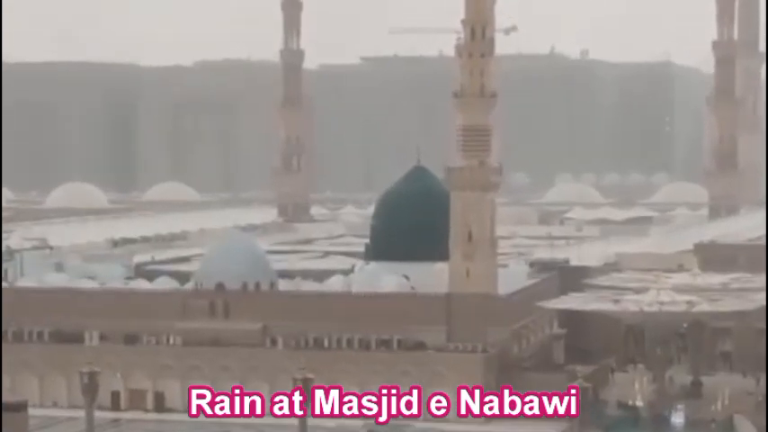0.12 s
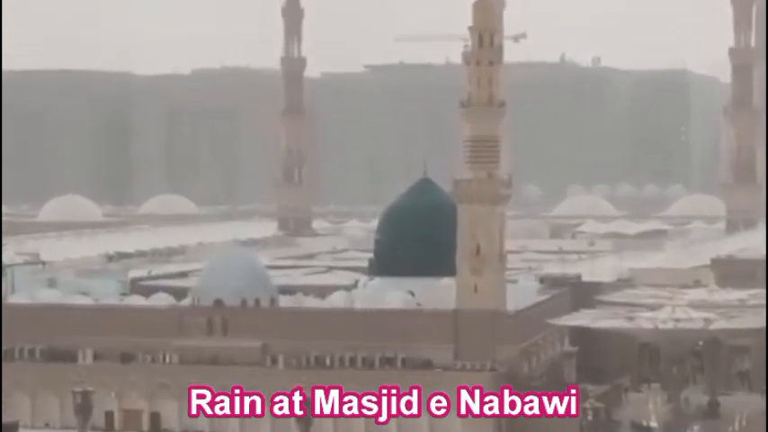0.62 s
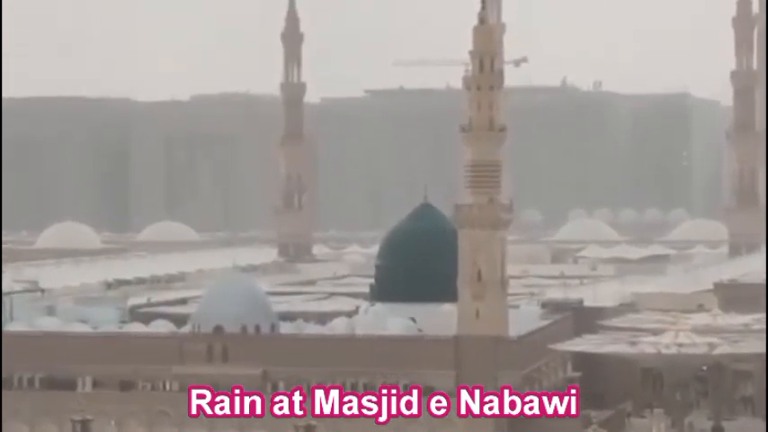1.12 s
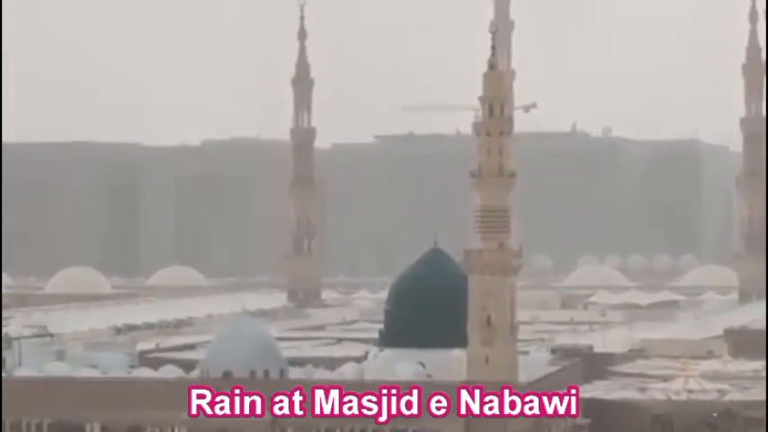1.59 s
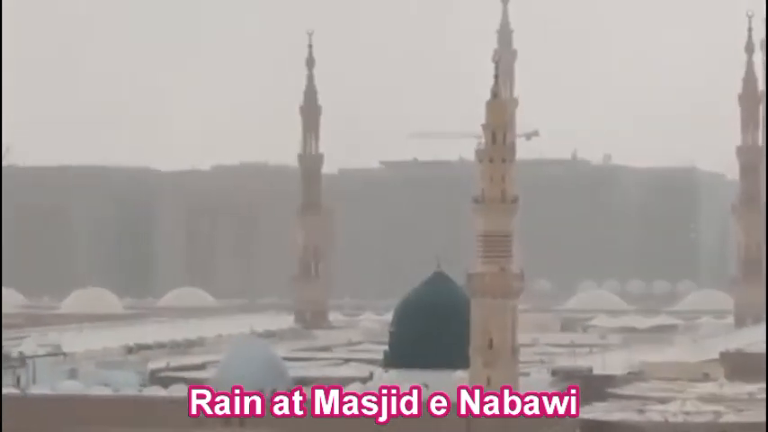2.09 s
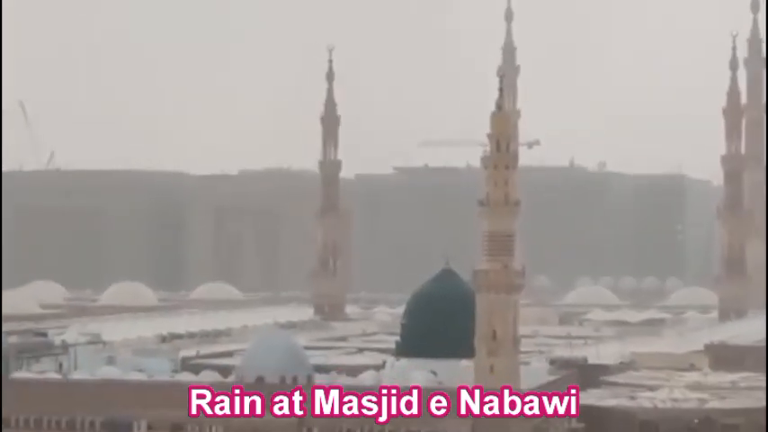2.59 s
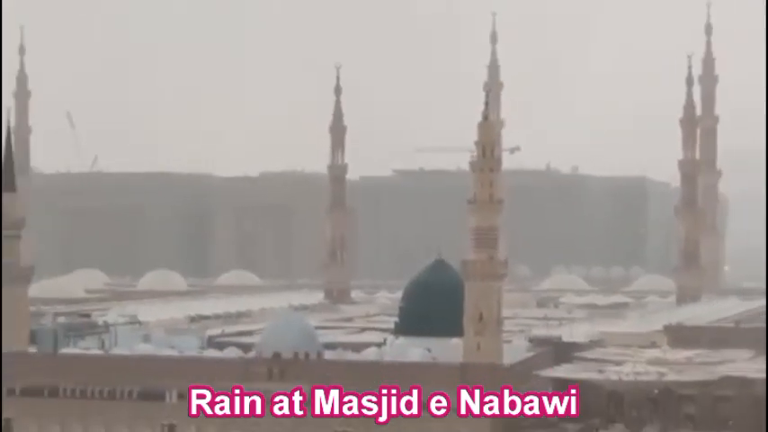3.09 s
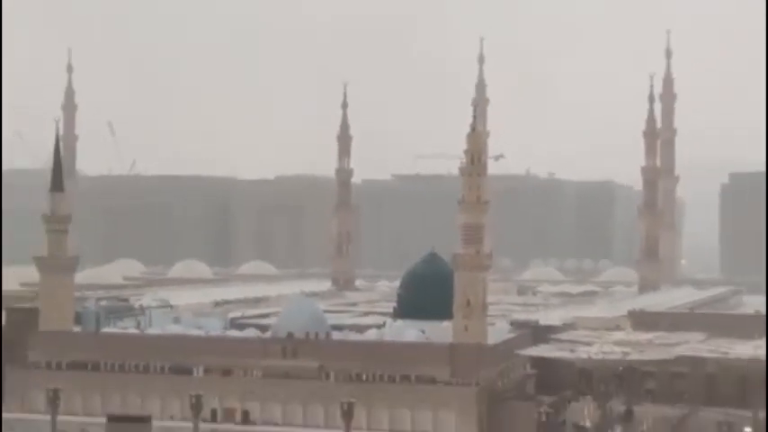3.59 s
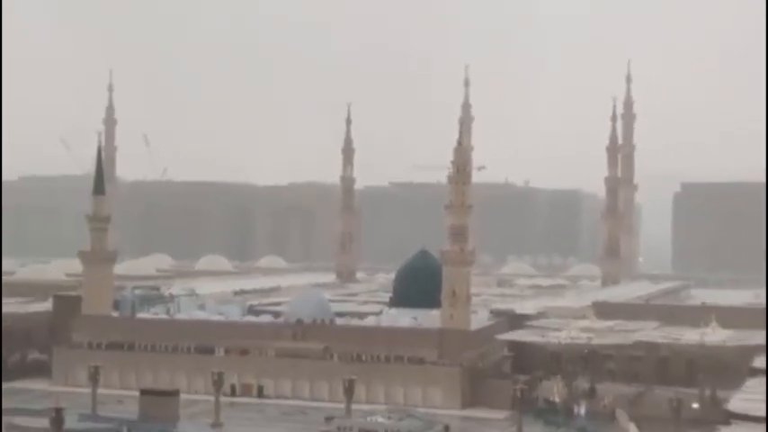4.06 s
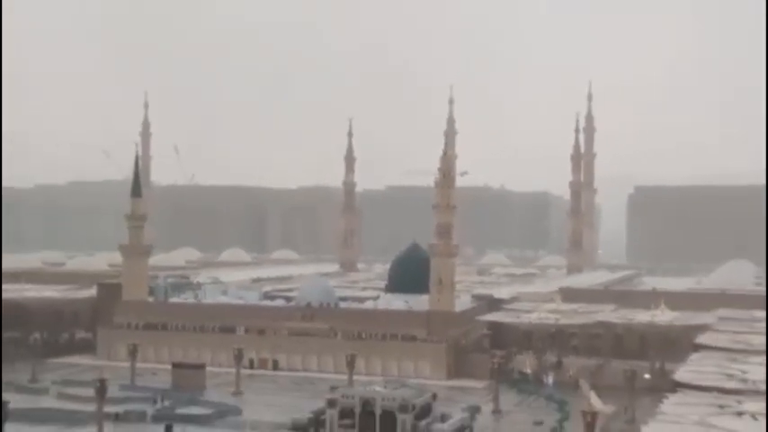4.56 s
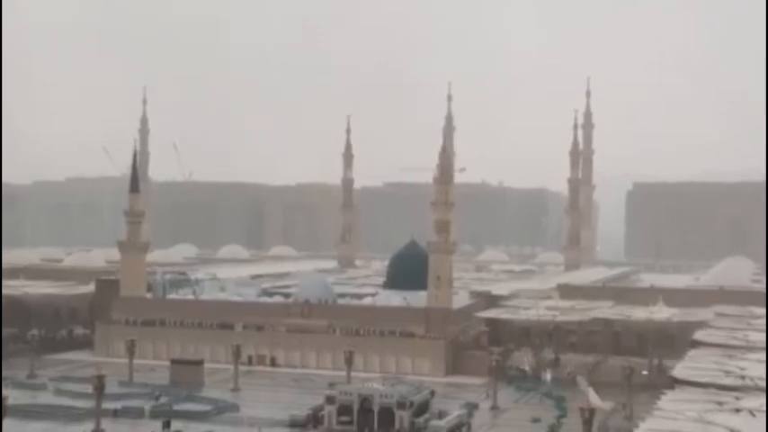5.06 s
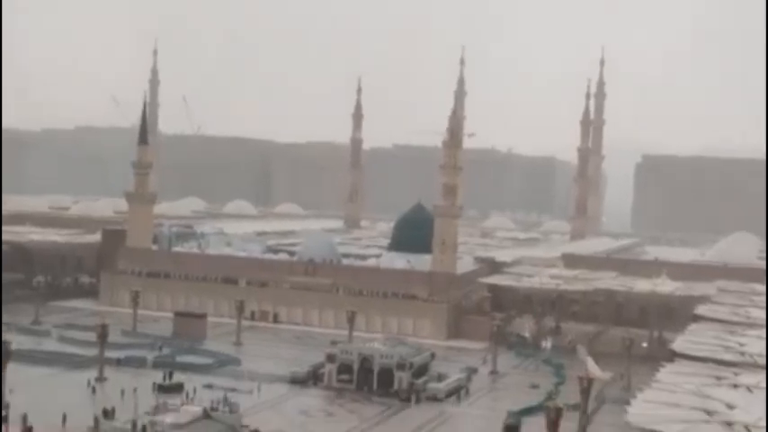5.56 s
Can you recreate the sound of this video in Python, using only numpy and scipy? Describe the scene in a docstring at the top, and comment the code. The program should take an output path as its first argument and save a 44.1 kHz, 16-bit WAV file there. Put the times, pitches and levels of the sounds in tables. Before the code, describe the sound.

Outdoors above a large paved square, dense rain makes a constant wide hiss with a fine patter of nearer drops. Far thunder is already building at the start, rolls strongest near two seconds, eases after three, swells again past four and fades. One larger drop puffs close by around three and a half seconds. The stereo microphones are high up; the treble is dull and slightly watery from compression.

```python
"""A wide paved square in heavy rain, heard from high up by a pair of microphones, with far thunder rolling.
Rain: shaped noise makes a smooth wide hiss, short ticks make the fine patter of nearer drops, and a puff
of noise makes one larger drop close by. Narrow, brief gaps are cut into the sound of hiss and patter.
Thunder: shock fronts from many parts of the lightning channel arrive as five dense, dull streams of
clicks that swell and fade, with small patches made louder or quieter."""
import sys
import numpy as np
from scipy import signal
from scipy.fft import rfft, irfft, next_fast_len
from scipy.io import wavfile
from scipy.ndimage import uniform_filter1d

SR = 44100
rng = np.random.default_rng(int(sys.argv[2]) if len(sys.argv) > 2 else 0)


def file_out(sig):
    """Save sig as 16-bit WAV at sys.argv[1]."""
    # one column per channel
    cols = np.atleast_2d(sig).T
    # limit, then scale
    lim = np.clip(cols, -1, 1)
    pcm = np.round(lim * 32767).astype(np.int16)
    wavfile.write(sys.argv[1], SR, pcm)


def makeup_ratio(level_db):
    """Linear amplitude ratio for a level in decibels (20 dB per factor of ten)."""
    decades = np.asarray(level_db, float) / 20
    return 10 ** decades


N = 250047  # samples, about 5.67 s


def evened(x):
    """Scales a sound to an average strength (rms) of 1."""
    return x / np.sqrt(np.mean(x ** 2) + 1e-20)


def smoothed_twice(x, size):
    """Takes a running average two times over."""
    return uniform_filter1d(uniform_filter1d(x, size), size)


def read(points, hz):
    """Reads a table between its points, with pitch spaced as the ear hears it (log scale)."""
    f, value = np.transpose(points)
    return np.interp(np.log(hz + 1), np.log(f + 1), value)


def curve(rows, t):
    """Reads every column of a table of times at the moments t."""
    s, *columns = np.transpose(rows)
    return [np.interp(t, s, c) for c in columns]


def scatter(per_s, spread_db):
    """Clicks of random sign at random moments; a few are large."""
    when, sign = rng.random((2, N))
    size = makeup_ratio(spread_db * np.minimum(rng.exponential(1, N), 4))
    return (when < per_s / SR) * np.sign(sign - 0.5) * size


def share_below(field):
    """About the share of normal random numbers that lie below each value."""
    return 1 / (1 + np.exp(-1.702 * field))


# Colour of the hiss, shape only: [f/Hz, level/dB per Hz]
RAIN_COLOUR = [(90, -80), (150, -22), (200, -0.5), (300, -7), (492, -0.5), (700, -1), (1060, -3),
               (2030, -3), (2800, -4), (3660, -5), (4910, -4.5), (7000, -8), (7600, -9.5), (7850, -14.5),
               (8020, -21), (8250, -16.5), (9240, -21.5), (10800, -25.5), (11500, -27.5), (11900, -34),
               (12150, -55), (13000, -90)]
# Hiss before the gaps are cut: [t/s, level/dB, extra level below about 1500 Hz/dB]
RAIN_LEVEL = [(0.0, -30, 0.6), (0.6, -31.5, 0.8), (1.2, -31, 0.2), (1.9, -31.2, -0.6), (2.4, -31.5, -2),
              (3.0, -31, -.5), (3.5, -30, -2), (5.1, -31.5, -0.5), (5.67, -30.5, -1.5)]
# How alike the hiss is at left and right: [f/Hz, likeness (1 = the same)]
RAIN_LIKENESS = [(120, 0.92), (300, 0.87), (1200, 0.18), (2500, 0.039), (7000, 0.013), (7800, .05),
                 (8200, 0.23), (11500, 0.16)]
# Left against right: [f/Hz, left minus right level/dB]
RAIN_BALANCE = [(120, -5), (300, 3), (1000, 0), (3000, 0.5), (6000, -0.7), (9000, -2.5)]
RAIN_LAG_S = 0.000045  # below the treble, the hiss reaches the right microphone this much earlier


def rain():
    """Countless far drops blend to noise, with faint drifting patches and a quick shared flicker."""
    frames, hz = N // 512 + 5, np.fft.rfftfreq(2048, 1 / SR)
    a, b, c, d, patches = rng.standard_normal((frames, 1025, 5)).T
    patches = uniform_filter1d(patches, size=16, axis=0)
    patches = evened(uniform_filter1d(patches, size=5, axis=1))
    flicker = evened(uniform_filter1d(rng.standard_normal(frames), size=4))

    # the right side is partly a copy of the left, partly noise of its own
    same = read(RAIN_LIKENESS, hz)[:, None]
    left, own = a + 1j * b, c + 1j * d
    z = np.array([left, same * left + np.sqrt(1 - same ** 2) * own])

    half_balance_db = read(RAIN_BALANCE, hz)[:, None] / 2
    colour_db = read(RAIN_COLOUR, hz)[:, None] + 0.26 * patches + 0.08 * flicker
    z *= makeup_ratio(colour_db + np.array([half_balance_db, -half_balance_db]))
    lag_s = RAIN_LAG_S / (1 + (hz / 4000) ** 6)
    z[0] *= np.exp(-2j * np.pi * hz * lag_s)[:, None]

    body_db = curve(RAIN_LEVEL, (np.arange(frames) - 2) * 512 / SR)[1]
    z *= makeup_ratio(body_db / (1 + (hz[:, None] / 1500) ** 4))
    hiss = evened(signal.istft(z, nperseg=2048, noverlap=1536)[1][:, :N])
    return makeup_ratio(curve(RAIN_LEVEL, np.arange(N) / SR)[0]) * hiss


PATTER_DB, PATTER_PER_S = -47.5, 2500  # level before the gaps are cut; ticks per second


def patter():
    """Nearer drops: short ticks of a few cycles, each size of drop with its own pitch and place."""
    out = np.zeros((2, N))
    t = np.arange(200) / SR
    for hz in np.geomspace(1500, 5500, num=12):
        tick = np.sin(2 * np.pi * hz * t) * t * hz * np.exp(-t * hz / 1.4)
        ticks = signal.oaconvolve(scatter(PATTER_PER_S / 12, spread_db=5), evened(tick))[:N]
        place = rng.random() * np.pi / 2  # from left (0) to right
        out += np.outer([np.cos(place), np.sin(place)], ticks)
    return makeup_ratio(PATTER_DB) * evened(out)


# Brief, narrow gaps in the sound:
# [f/Hz, share of the time that is silent in the middle, the same at the sides]
GAPS = [(1210, 0.002, .01), (2320, 0.028, 0.061), (3520, 0.17, 0.098), (5100, 0.12, 0.07),
        (7200, 0.12, 0.16), (7540, 0.2, .4), (8170, 0.54, 0.95), (8750, 0.4, 0.75), (9400, 0.19, 0.68),
        (10500, 0.094, 0.52), (11500, 0.32, 0.47), (12000, 0.63, 0.83)]


def narrow_gaps(frames, hz):
    """Gains for the middle and the sides with brief narrow gaps, and wider blocks of silence above 7800 Hz."""
    thin, wide = rng.standard_normal((frames, len(hz), 2, 2)).T
    thin = uniform_filter1d(uniform_filter1d(thin, 6, axis=1), 7, axis=2)
    wide = uniform_filter1d(uniform_filter1d(wide, 30, axis=1), 7, axis=2)
    wide = wide[:, np.arange(len(hz)) // 18 * 18]  # blocks have straight edges
    blocks = 0.96 * (hz > 7800)[:, None]
    # the middle and the sides share the blocks but not the thin gaps
    field = np.sqrt(1 - blocks) * evened(thin) + np.sqrt(blocks) * evened(wide[0])

    rows = np.array(GAPS)
    share = np.array([read(rows[:, [0, k]], hz) for k in (1, 2)])
    share = np.clip(share, 1e-4, 0.95)[..., None]
    soft_edge = 0.095 * np.minimum(share, 1 - share)
    return np.clip((share_below(field) - share) / soft_edge, 0, 1)


# Fine speckle of tiny gaps in the sound: [f/Hz, share that is silent]
SPECKLE = [(600, .03), (1400, .12), (2600, .25), (6000, .27), (7200, .45), (9000, .55), (11500, .6)]


def speckle(frames, hz):
    """Gains with tiny gaps, about 40 Hz wide and 50 ms long, that roughly keep the loudness."""
    field = rng.standard_normal((frames, len(hz), 2)).T
    field = evened(uniform_filter1d(uniform_filter1d(field, size=2, axis=1), size=5, axis=2))
    share = read(SPECKLE, hz)[:, None]
    return (share_below(field) > share) / np.sqrt(1 - share)


# One larger drop close by: [t/s, level before its rise and fade/dB]
SPLASHES = [(3.458, -31.5)]


def splash():
    """A larger drop: a soft puff of bright noise that dies fast."""
    out, t = np.zeros((2, N)), np.arange(8000) / SR
    band = signal.butter(8, [3800, 9700], "bandpass", fs=SR, output="sos")
    for s, db in SPLASHES:
        puff = evened(signal.sosfilt(band, rng.standard_normal((2, len(t)))))
        rise = 1 - np.exp(-t / 0.009)
        out[:, round(s * SR):][:, :len(t)] += puff * rise * makeup_ratio(db - 60 * t / 0.14)
    return out


def random_switch(share):
    """A switch that goes on and off at random, on for this share of the time."""
    slow = evened(smoothed_twice(rng.standard_normal(N), round(0.07 * SR)))
    return slow < np.quantile(slow, share)


def steadied(x, span_s, amount):
    """Divides out part of the chance swells that last longer than span_s, and evens the strength."""
    power = smoothed_twice((x ** 2).mean(axis=0), round(span_s * SR))
    return evened(x / (abs(power) + 1e-20) ** (amount / 2))


# Each stretch of the lightning channel sends one swell:
# [peak t/s, rise/s, peak level/dB, fade/dB per s, brightness/dB per octave]
SWELLS = [(0.55, 0.26, -23.5, 1, 1.65), (1.45, 0.3, -23.5, 3.5, -2), (1.9, 0.46, -19.5, 4.5, -0.1),
          (2.6, 0.64, -23.5, 20.5, -0.5), (2.95, 0.17, -26.5, 9, -3), (3.45, .15, -30, 16, -4),
          (4.3, 0.54, -24, 4, 1), (4.75, 0.44, -28, 4, -6.5)]
RISE_DB = 14.5  # a swell climbs this much during its rise
MIDDLE_HZ = 110  # brightness tilts a swell about this pitch


def roll(t, hz, under_db, late_s, fade_factor, lasting_db):
    """Level of one stream: swells climb, fade and add up over a lasting rumble."""
    power = makeup_ratio(lasting_db) ** 2
    for peak_s, rise_s, peak_db, fade, bright in SWELLS:
        since = t - peak_s - late_s
        drop_db = np.where(since < 0, RISE_DB * (since / rise_s) ** 2, fade * fade_factor * since)
        tilt_db = bright * np.log2(hz / MIDDLE_HZ)
        power = power + makeup_ratio(peak_db + under_db + tilt_db - drop_db) ** 2
    return np.sqrt(power)


# Small patches of the roll that are mostly louder, one slightly quieter: [t/s, f/Hz, added level/dB]
LOUDER_PATCHES = [(0.49, 115, 7), (0.51, 47, 13), (0.53, 182, 6), (0.63, 142, 10), (0.8, 74, 10),
                  (0.99, 114, 7), (1.05, 244, 9), (1.17, 307, 8), (1.46, 73, 2.5), (1.56, 178, 7),
                  (1.7, 400, 6.5), (1.82, 400, 4.5), (1.83, 224, 2.5), (1.88, 104, 10.5), (2.03, 128, 8.5),
                  (2.08, 65, 6), (2.13, 400, 6), (2.2, 240, 3.5), (2.3, 350, 2), (2.35, 35, 3),
                  (2.45, 200, 4.5), (2.55, 52, 13), (2.7, 55, 10), (2.83, 119, 3), (2.89, 99, 12),
                  (2.96, 93, -3), (3.02, 104, 5), (3.07, 114, 15), (3.21, 109, 3), (3.29, 95, 10),
                  (3.39, 163, 6.5), (3.46, 93, 12), (3.59, 65, 2), (3.7, 120, 3.5), (3.77, 115, 4),
                  (4.0, 150, 1), (4.15, 82, 5), (4.27, 51.6, 14), (4.28, 178, 12), (4.32, 290, 7),
                  (4.38, 183, 5.5), (4.45, 50, 5), (4.6, 103, 7.5), (4.74, 32, 14), (4.86, 65, 3),
                  (5.62, 65, 6)]
# Small patches of the roll that are mostly quieter, a few slightly louder: [t/s, f/Hz, removed level/dB]
QUIETER_PATCHES = [(1.3, 250, 4), (2.15, 150, 13), (2.55, 282, 5), (3.13, 95, -1), (3.5, 170, 4),
                   (3.65, 200, 8), (3.85, 230, 10), (4.7, 129, 8), (5.0, 110, 1), (5.2, 240, -2.5),
                   (5.37, 90, 8), (5.55, 220, 1), (0.15, 181, 4), (0.27, 203, 11), (1.13, 161, 19),
                   (1.57, 52, 7), (2.27, 114, 7), (2.44, 40, 14), (3.08, 47, 7), (3.2, 170, 2.5),
                   (3.54, 114, 6), (3.35, 35, 8), (3.68, 45, 6), (3.77, 58, 20.5), (3.88, 50, 14),
                   (4.03, 65.3, 9.5), (4.45, 100, 1), (4.98, 42, -1), (5.47, 101, 16)]
PATCH_S, PATCH_OCTAVES = 0.022, 0.22  # bell width (standard deviation) of a patch in time and pitch


def patched(x):
    """Makes small patches of the roll louder or quieter around their moment and pitch."""
    hz, t, z = signal.stft(x, SR, nperseg=2048, noverlap=1792)
    lift_db = np.zeros((len(hz), len(t)))
    for s, pitch_hz, db in LOUDER_PATCHES + [(s, pitch_hz, -db) for s, pitch_hz, db in QUIETER_PATCHES]:
        away_t = (t - s) / PATCH_S
        away_pitch = np.log2((hz[:, None] + 1) / pitch_hz) / PATCH_OCTAVES
        lift_db += db * np.exp(-away_t ** 2 / 2 - away_pitch ** 2 / 2)
    return signal.istft(z * makeup_ratio(lift_db), nperseg=2048, noverlap=1792)[1][:, :N]


# Stretches in which the left-right difference of the bass is dropped: [from t/s, to t/s]
BASS_ALIKE = [(-.1, .53), (1.06, 1.24), (1.43, 1.6), (2.4, 2.55), (2.64, 2.83), (3.23, 3.63), (5.08, 5.1)]


def bass_alike(x):
    """Takes the left-right difference below 162 Hz away during the listed stretches."""
    t, side = np.arange(N) / SR, (x[0] - x[1]) / 2
    shut = sum((t > a) & (t < b) for a, b in BASS_ALIKE) * 1.0
    shut = uniform_filter1d(shut, size=800)
    highpass = signal.butter(6, 162, "highpass", fs=SR, output="sos")
    low = (side - signal.sosfiltfilt(highpass, side)) * shut
    return x - np.array([low, -low])


# Colour of one shock after its path through the air, shape only; one list per stream,
# longest shocks first: [f/Hz, level/dB per Hz]
SHOCK_COLOURS = [
    [(12, -5.5), (24, -7), (32, -3), (40, -2.5), (55, 3), (66, -2), (85, -15), (200, -75)],
    [(40, -50), (60, -3), (75, 1.5), (100, 3), (120, -0.5), (145, -10), (400, -78)],
    [(70, -93), (110, -2), (130, 2), (155, 0), (180, 0), (200, -8.5), (240, -29), (600, -90)],
    [(70, -90), (130, -40), (175, -22), (210, 3), (300, -2), (350, -5), (385, -17), (450, -35), (900, -92)],
    [(150, -90), (290, -22), (380, -1), (450, -1.5), (650, -9.5), (1000, -17), (2000, -26), (5000, -75)],
]
# Clicks of each stream:
# [shocks per s, left-right difference against the shocks/dB, share of time the difference is switched on]
STREAMS = [(400, -18.5, 0.49), (708, -25.5, 0.53), (989, -20.5, 0.7), (3008, -11, .8), (2984, -9, 0.91)]
# How each stream follows the swells:
# [middle f/Hz, level against the swell/dB, arrives late/s, fade speed factor, lasting rumble level/dB]
STREAM_RULES = [(45, -10.5, 0.019, 1.7, -32), (90, -5.5, 0.0029, 1.58, -33.5),
                (150, -5, 0.024, 1.75, -37.5), (260, -13, 0.0025, 1.34, -43), (450, -21, .003, 1.32, -50.5)]


def thunder():
    """Five streams of shock fronts, each with its own colour; nearly the same at both microphones."""
    size = next_fast_len(N + SR)
    hz, t = np.fft.rfftfreq(size, 1 / SR), np.arange(0, N / SR + 0.01, 0.005)
    out = np.zeros((2, N))
    for rule, colour, (per_s, difference_db, share) in zip(STREAM_RULES, SHOCK_COLOURS, STREAMS):
        fronts = scatter(per_s, spread_db=2)
        # the left-right difference is switched on and off at random
        difference = random_switch(share) * scatter(per_s, spread_db=1)
        pair = fronts + makeup_ratio(difference_db) * np.array([difference, -difference])
        stream = irfft(rfft(pair, size) * makeup_ratio(read(colour, hz)), size)[:, :N]
        level = np.interp(np.arange(N) / SR, t, roll(t, *rule))
        out += level * steadied(stream, span_s=0.12, amount=0.46)
    return bass_alike(patched(out))


def scene():
    """The hiss and patter of rain with narrow, brief gaps cut into them, plus a splash and thunder."""
    turn = np.array([[1, 0.97], [1, -1]]) / np.sqrt(2)  # left-right to middle-sides, and back
    hz, t, z = signal.stft(turn @ (rain() + patter()), SR, nperseg=2048, noverlap=1536)
    z = z * narrow_gaps(len(t), hz) * speckle(len(t), hz)
    gapped = turn @ signal.istft(z, nperseg=2048, noverlap=1536)[1][:, :N]
    return gapped + splash() + thunder()


def top_cut(x):
    """Nothing passes above the cut-off."""
    return signal.sosfilt(signal.butter(12, 12160, fs=SR, output="sos"), x)


def record(dry):
    """Passes the finished mix on to be stored, with nothing else added."""
    return top_cut(dry)


dry = scene()
out = record(dry)
file_out(out)
```